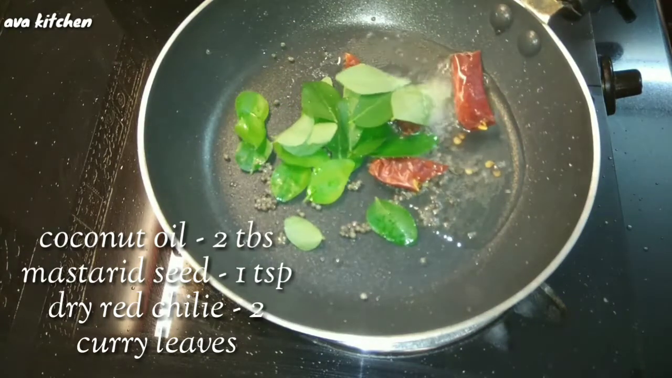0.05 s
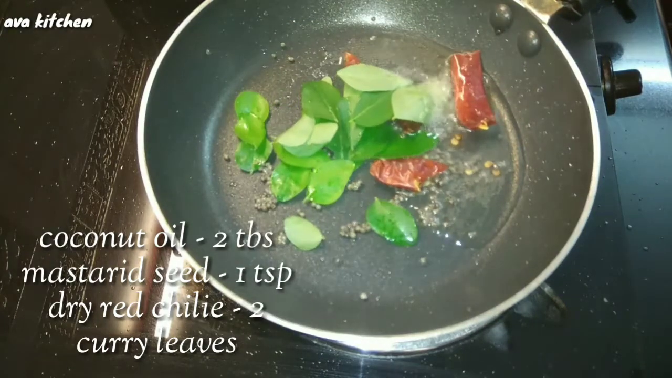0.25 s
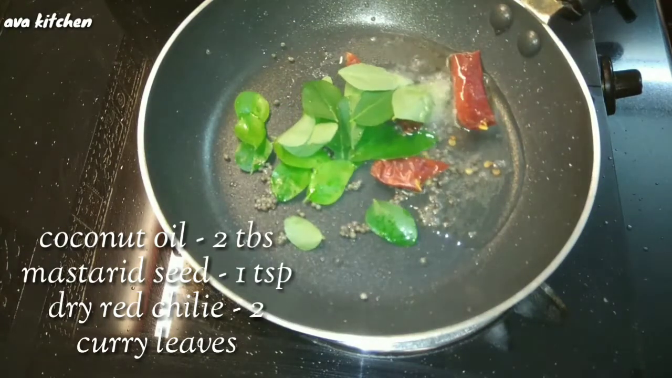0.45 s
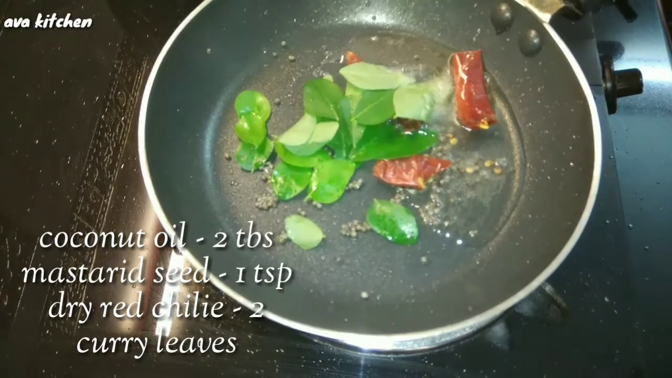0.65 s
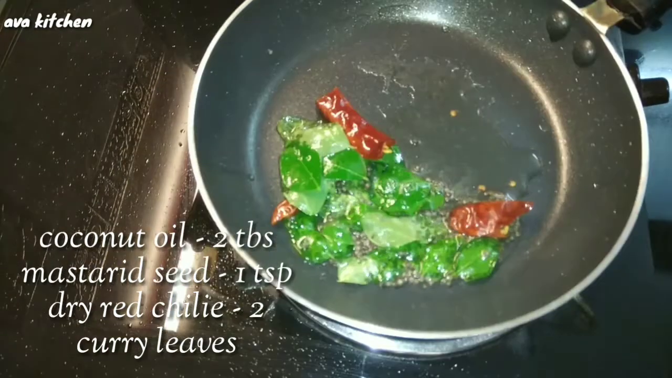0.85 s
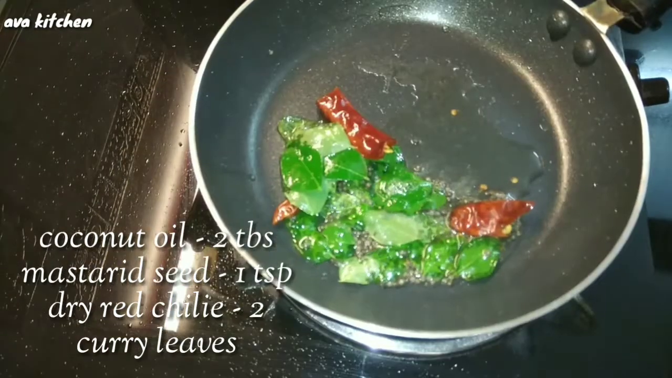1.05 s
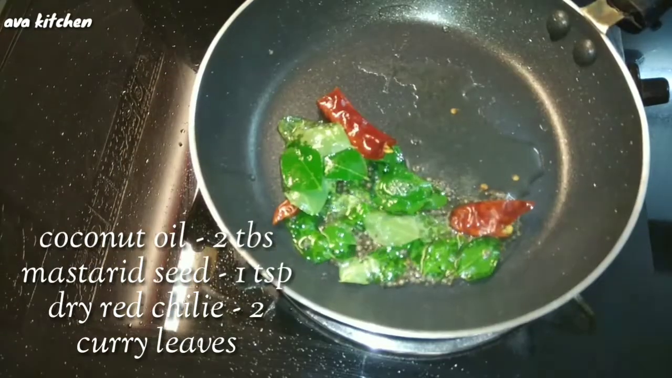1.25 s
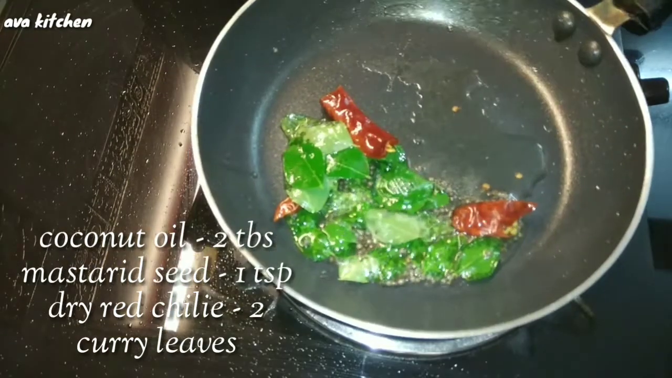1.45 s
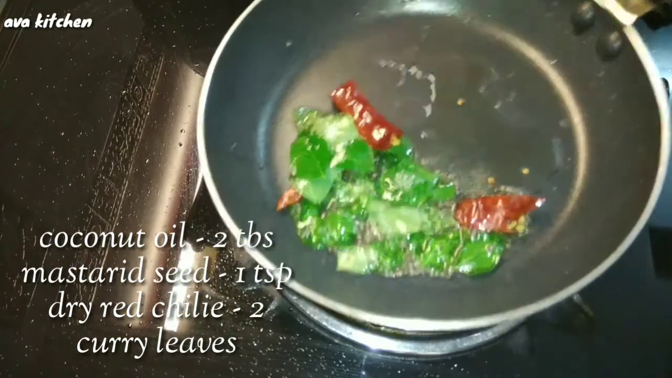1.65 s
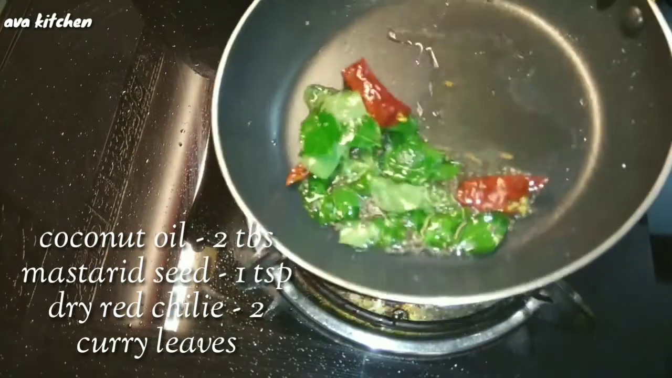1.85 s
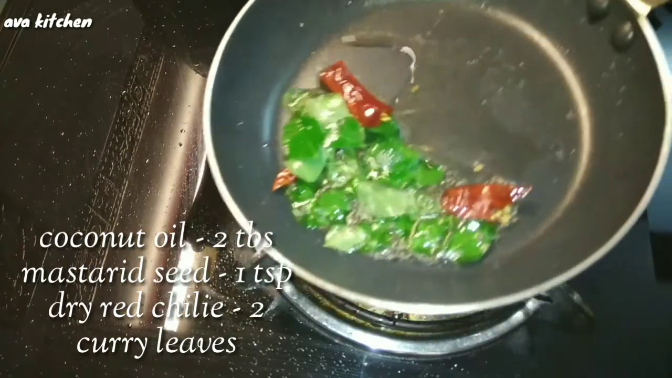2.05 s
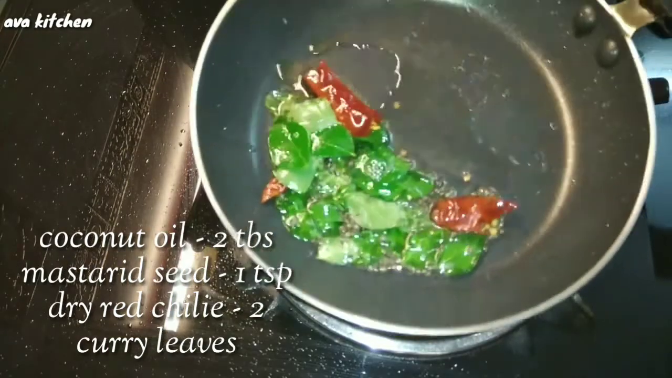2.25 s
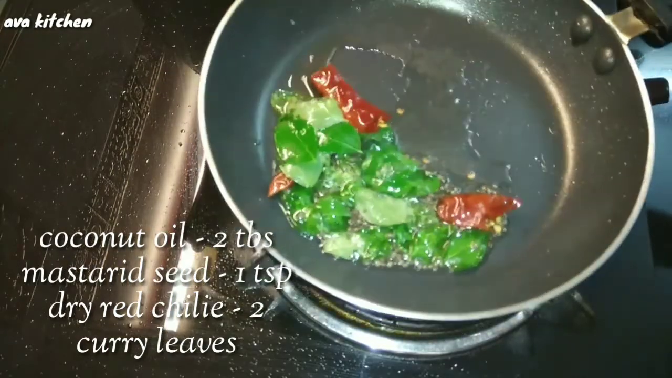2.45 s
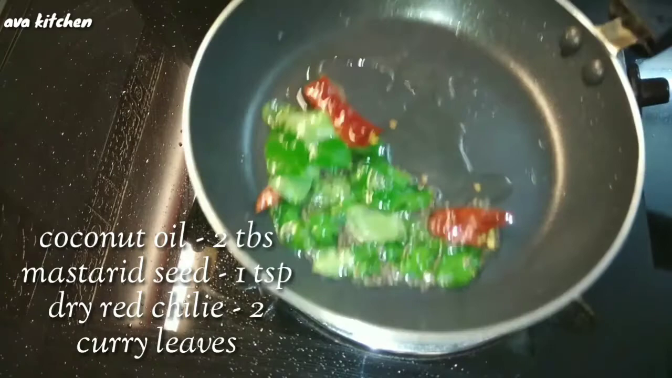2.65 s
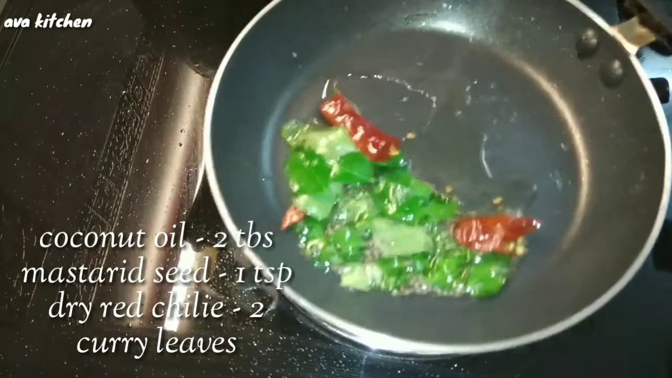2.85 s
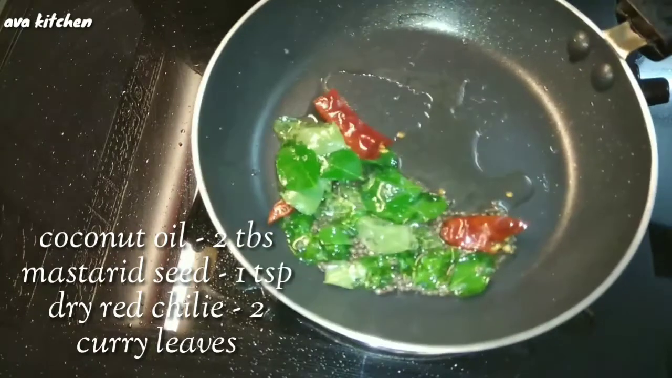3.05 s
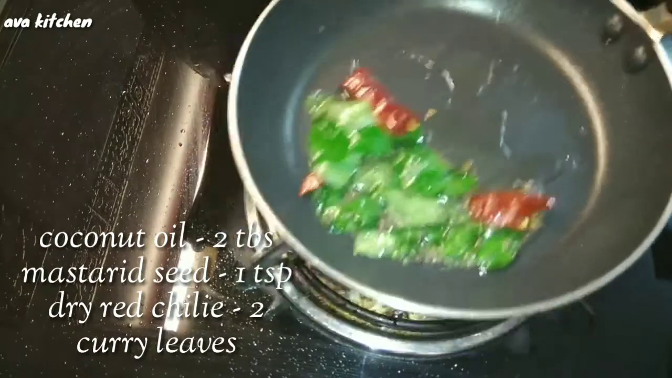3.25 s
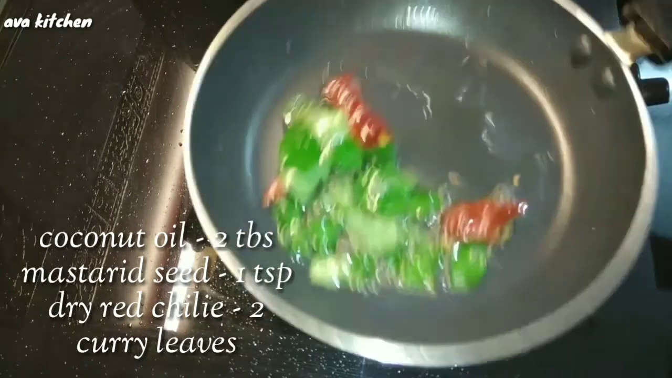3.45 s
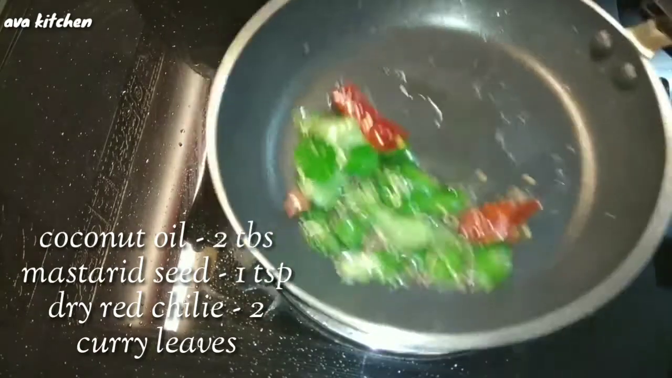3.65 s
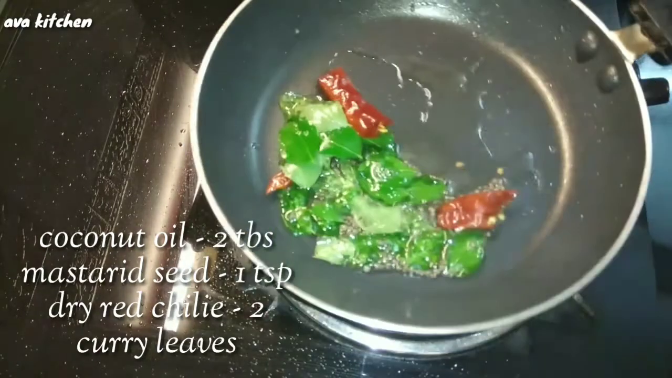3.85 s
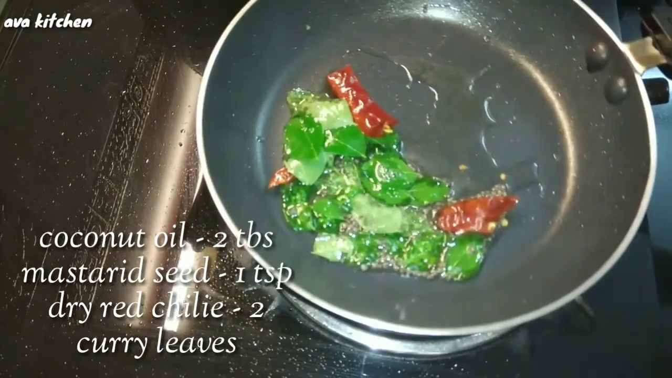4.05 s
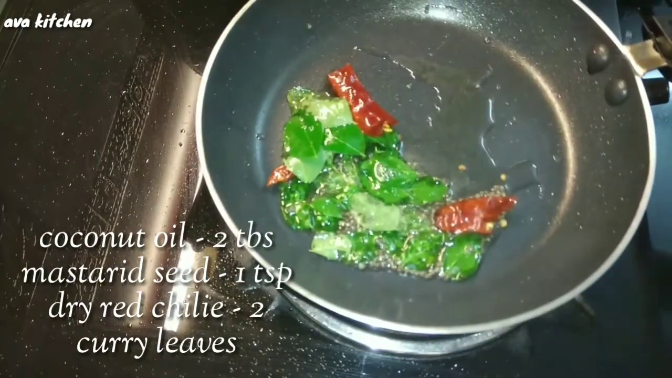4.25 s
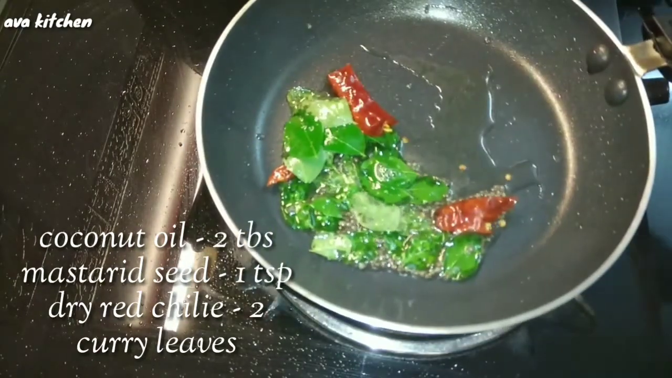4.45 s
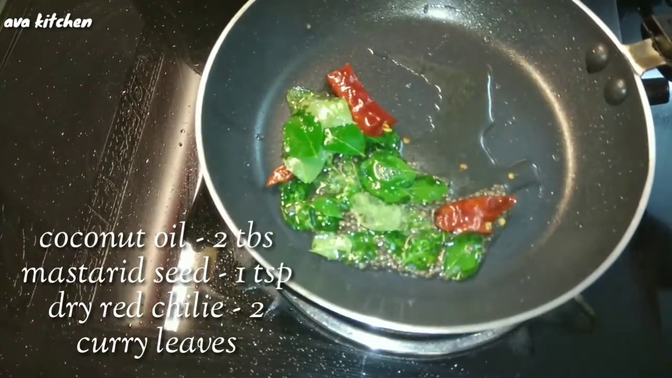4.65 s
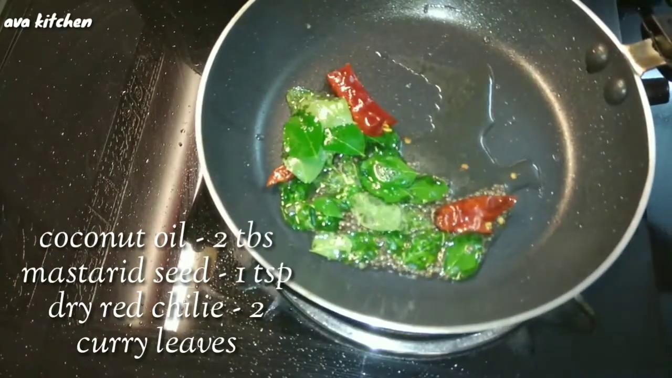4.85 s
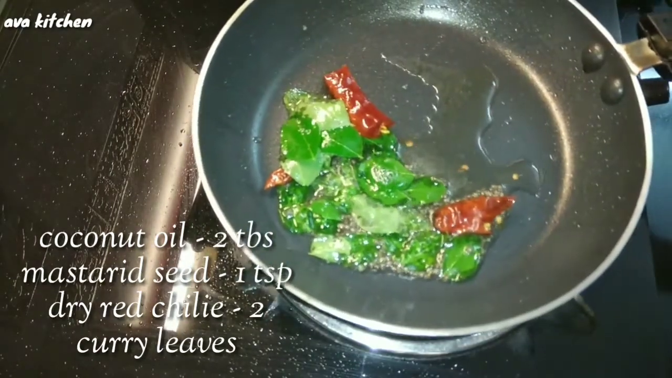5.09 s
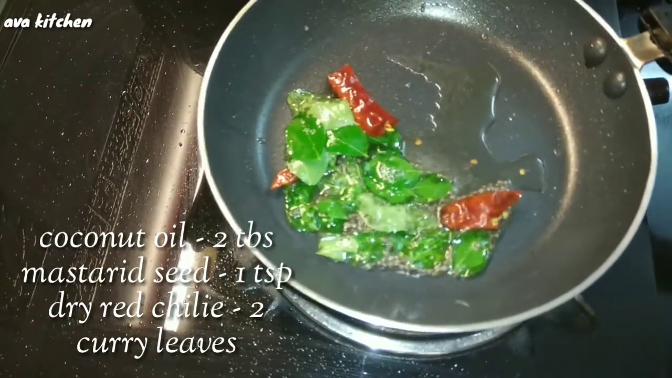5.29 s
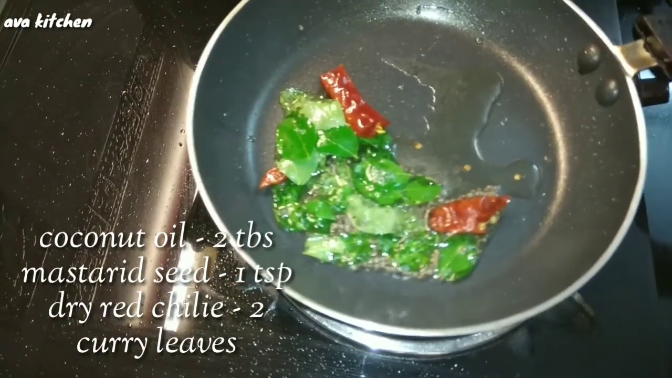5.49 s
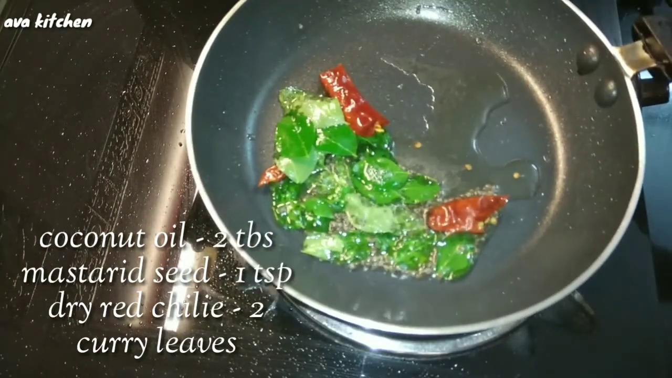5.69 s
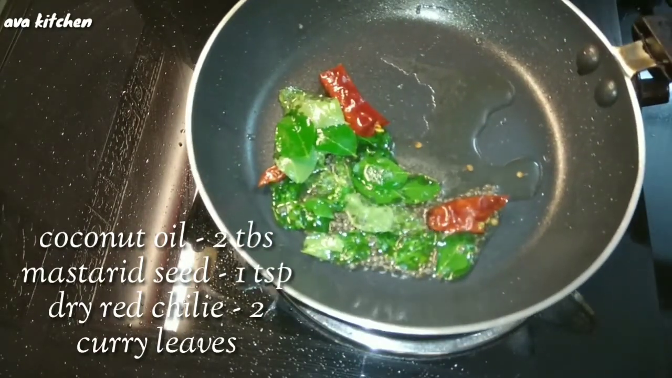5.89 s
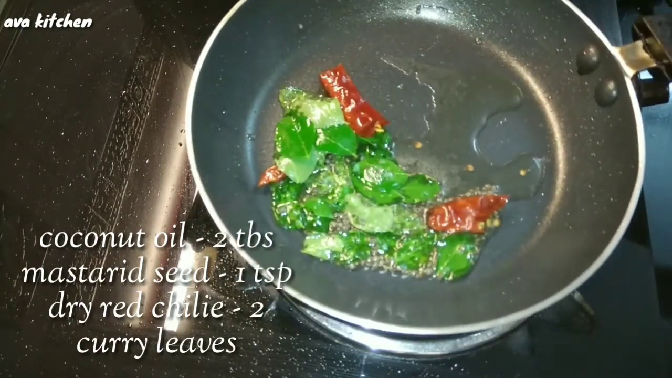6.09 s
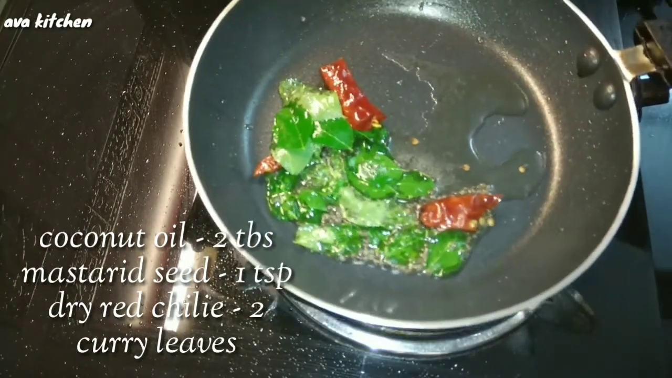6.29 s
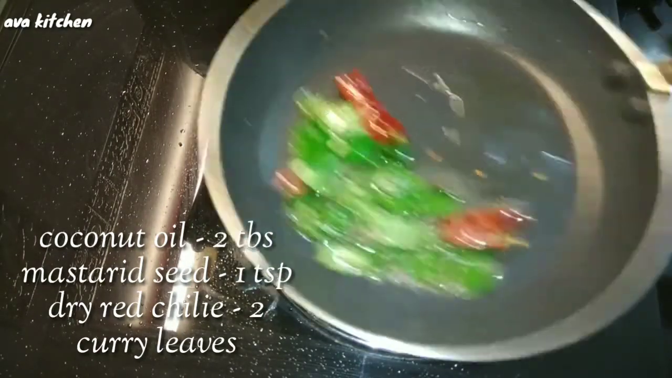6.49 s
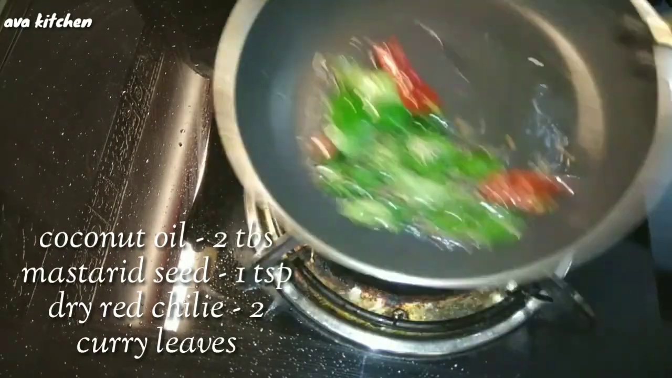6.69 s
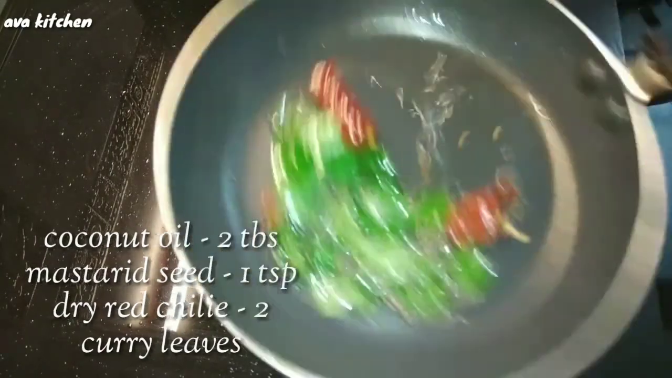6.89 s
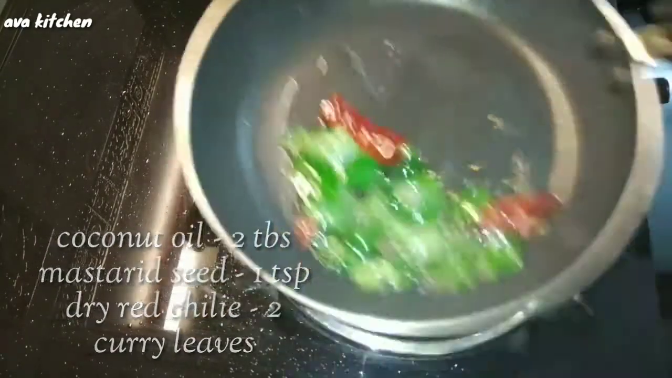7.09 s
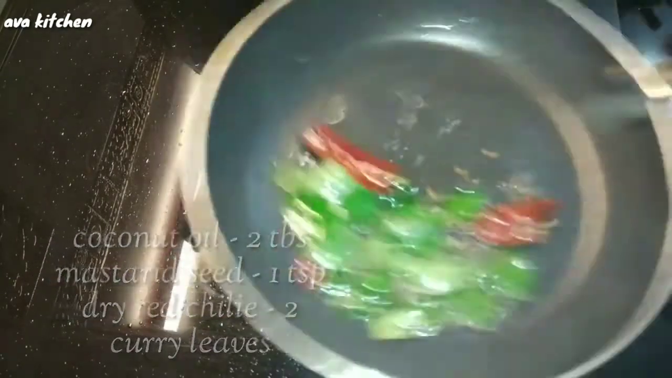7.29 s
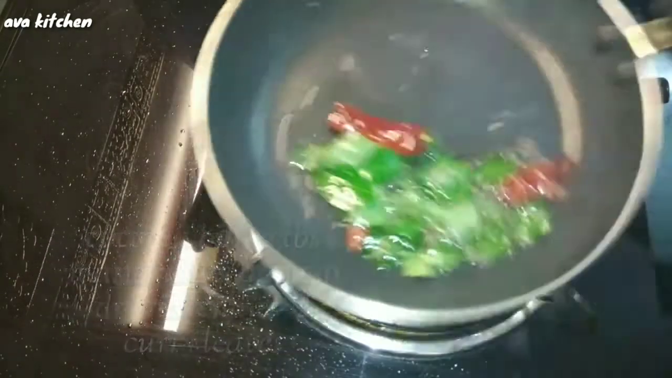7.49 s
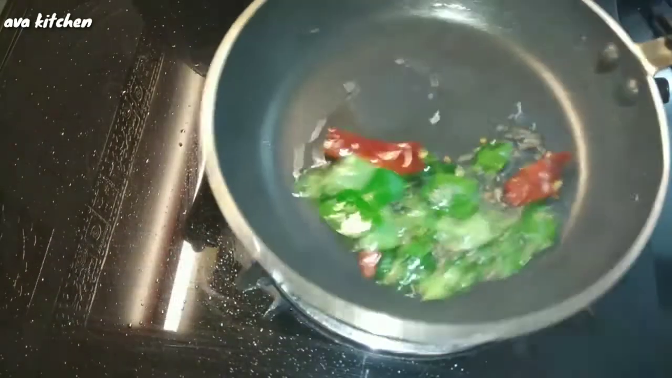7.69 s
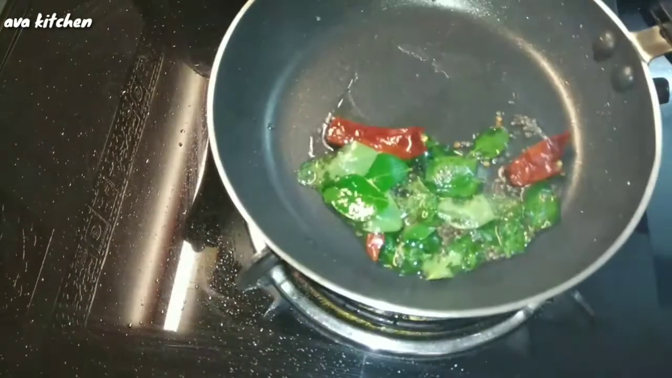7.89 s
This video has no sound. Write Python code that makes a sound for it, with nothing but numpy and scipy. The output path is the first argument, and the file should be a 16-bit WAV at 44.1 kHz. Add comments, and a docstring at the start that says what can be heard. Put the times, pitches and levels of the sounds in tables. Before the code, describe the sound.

Close up in a hard-walled kitchen, fresh leaves meet hot oil with a violent burst of bright hiss for half a second. The sizzle then drops to a thin fizz, full of sharp cracks, ticking bubbles and snapping pops. The small pan is shaken over its metal grate, knocking and scraping around two to three and a half seconds, then clanking hardest near seven and a half. A very faint low drone comes and goes.

```python
"""A fierce rush of sizzling, then cracks, pops and metallic knocks: curry leaves, dry chillies and mustard seeds
fry in a small pan, heard close in a hard-walled kitchen. Sizzle is shaped noise that swells in spurts; cracks are
resonated noise bursts; pops join a bright spray to a ringing snap. The shaken pan sounds by decaying modes, rattle
and rubbing noise. A faint low drone of wavering partials comes and goes; the loudest pops saturate."""
import sys
import numpy as np
from scipy import signal
from scipy.fft import rfft, irfft, next_fast_len
from scipy.io import wavfile
from scipy.ndimage import map_coordinates

SR = 44100
rng = np.random.default_rng(int(sys.argv[2]) if len(sys.argv) > 2 else 0)


def transcribe(signal):
    """Save signal, clipped to [-1, 1], as a 16-bit WAV file at the path in sys.argv[1]."""
    frames = np.atleast_2d(signal).T
    limited = np.clip(frames, -1, 1)
    pcm = np.round(limited * 32767).astype(np.int16)
    wavfile.write(sys.argv[1], SR, pcm)


N = 349834
TOP_HZ = 15800  # upper band limit

# How hard the oil boils, fiercest as the fresh leaves meet it. Each row: time in seconds, relative level in dB.
BOIL = [(0, -8.5), (.11, -29.5), (.15, -18), (.44, -18), (.49, -29), (.88, -29.5), (1.15, -25),
        (1.5, -29.5), (1.85, -29.5), (2.5, -29), (3.66, -31), (4.22, -30), (5.1, -29.5), (5.47, -29.5),
        (5.66, -30.5), (6.1, -32.5), (6.45, -28), (7.93, -31)]
# Spectra of the gentle fizz and of the fine spray. Each row: frequency in Hz, relative density in dB per Hz.
FIZZ_SPECTRUM = [(200, -68), (700, -13), (1200, -4.5), (2400, 9), (6500, 1.5), (8000, 10.5), (9800, 20),
                 (12500, 19.5), (15500, 11)]
SPRAY_SPECTRUM = [(200, -36), (700, -21), (3000, -30.5), (6000, -5), (8000, -2.5), (9800, 1), (12500, 0.5),
                  (15500, 0)]


def sizzle(spread_db, spurt_share):
    """Superposition of impulses: countless tiny steam bubbles breaking at the leaves merge into noise."""
    boil_s, boil_db = np.transpose(BOIL)
    level_db = np.interp(np.arange(N) / SR, boil_s, boil_db)
    # steam escapes in little spurts, about 60 a second, which start at once and fade
    flow = unit(np.sqrt(1 + spurt_share * spurts(60, fade_s=.008)))
    bubbles = spiky(N, spread_db) * flow * amp(level_db - 2.5)
    # when the oil boils hard, the power passes from the fizz to a fine bright spray
    fierce = np.clip((level_db + 27.5) / 12, 0, 1)
    fizz = coloured(bubbles * np.sqrt(1 - fierce), FIZZ_SPECTRUM)
    return fizz + coloured(bubbles * np.sqrt(fierce), SPRAY_SPECTRUM)


# The loudest bursts of water in the oil. Each row: start in seconds, relative spray level in dB over 10 ms,
# relative snap level in dB over 10 ms, life in seconds.
WATER_BURSTS = [(0.1434, -11, -14, 0.01), (0.165, -5.5, -21, 0.0051), (0.441, -9.5, -18, 0.0018),
                (0.5593, -21, -23, 0.0057), (0.6646, -13, -18, 0.0033), (1.3647, -24, -20, 0.0024),
                (1.6865, -12, -24, 0.0038), (1.712, -19.5, -19, 0.0044), (1.819, -26, -22.5, 0.0067),
                (1.925, -22, -17.5, 0.0038), (2.1817, -11.5, -11, 0.003), (2.3335, -22.5, -24, 0.0024),
                (2.4675, -7.5, -14.5, 0.0026), (2.7, -18.5, -21, 0.0082), (3.475, -20, -19, 0.0028),
                (3.598, -26, -15, 0.0044), (3.8111, -18, -21, 0.001), (4.0449, -20.5, -26, 0.004),
                (5.1025, -18, -27.5, 0.007), (5.2505, -13.5, -25, 0.0034), (5.346, -9.5, -24.5, 0.0045),
                (6.257, -15, -29, 0.0046), (6.4445, -18, -47, 0.0048), (6.4817, -18, -30.5, 0.019),
                (6.8648, -7.5, -28.5, 0.0052), (7.1883, -17, -16.5, 0.0041)]
# Spectrum of the snap. Each row: frequency in Hz, relative density in dB per Hz.
SNAP_SPECTRUM = [(40, 2), (200, -4), (600, 4), (1200, 10), (2200, 5), (4000, 16), (6500, 19), (9000, 14),
                 (15000, -63)]


def pops(rows, grain_db, jet_hz, jet_share, cavity_hz, cavity_q, ring_share, froth_db):
    """Flash boiling and cavity resonance: a drop turns to steam, snaps, rings briefly and sprays droplets."""
    spray, snap = np.zeros((2, 2, N))
    t = np.arange(SR // 6) / SR
    rise, fade = 1 - np.exp(-t / .0006), np.exp(-t / .04)

    def blow(x, db):
        return amp(db) * burst(x, .01)

    for s, spray_db, snap_db, life in rows:
        # the longest bursts leave a patch of froth that fizzes on
        froth_gain = amp(froth_db) * min(life / .007, 1) ** 2
        froth = froth_gain * fade * rng.standard_normal((2, len(t)))
        droplets = spiky(len(t), grain_db) * np.exp(-.5 * (t / life) ** 2)
        volley = rise * (droplets + froth)
        # the oil film tears first, in one needle-sharp crack
        volley += 1.5 * rng.standard_normal((2, len(t))) * np.exp(-t / .0002)
        # the steam leaves through a vent of its own size, which gives each burst a pitch
        vent_hz = jet_hz * np.exp(.12 * rng.standard_normal())
        jet = resonate(volley, vent_hz, 4.6)
        add(spray, s, blow(unit(volley) + jet_share * jet, spray_db))

        crack = spiky(len(t), grain_db) * np.exp(-(t / life) ** 2)
        ring_hz = cavity_hz * 1.7 ** (rng.random() - .5)
        ring = resonate(crack, ring_hz, cavity_q)
        add(snap, s, blow(unit(crack) + ring_share * ring, snap_db))
    return coloured(spray, SPRAY_SPECTRUM) + coloured(snap, SNAP_SPECTRUM)


def cracks(rows, life_s, spit_db, spit_s, q, low_hz):
    """Impulsive excitation of resonances: a sharp split rings at two pitches, and a faint spit follows it."""
    track = np.zeros((2, N))
    t = np.arange(int(6 * spit_s * SR)) / SR
    highpass = signal.butter(2, low_hz, "highpass", fs=SR)
    for s, db, hz in rows:
        life = life_s * np.exp(.5 * rng.standard_normal())  # life_s is the median
        envelope = np.exp(-t / life) * (1 - np.exp(-2 * t / life))
        split = rng.standard_normal((2, len(t))) * envelope
        split += amp(spit_db) * spiky(len(t), 6) * np.exp(-t / spit_s)
        ring = resonate(resonate(split, hz, q), hz, q)
        # the second pitch is weaker
        second_gain = .5 * rng.random()
        second_hz = hz * 2 ** rng.uniform(-1.92, 1)
        ring = ring + second_gain * resonate(split, second_hz, 2 * q)
        sound = signal.lfilter(*highpass, ring + .25 * unit(split))
        add(track, s, amp(db) * burst(sound, .01))
    return track


def crackles(per_second, least_db, spread_db, range_db, full_boil_db, count=1600):
    """Random arrivals: fainter cracks, louder in harder boiling, mostly high; rows of s, dB, pitch Hz."""
    when, size, colour, chance = rng.random((count, 4)).T
    s = when * N / SR
    boil_db = np.minimum(np.interp(s, *np.transpose(BOIL)), full_boil_db)
    size_db = np.minimum(-spread_db * np.log(size), range_db)
    lowness = colour ** 4  # mostly near 0; the lower cracks are also fainter
    rows = np.transpose([s, least_db + boil_db + size_db - 9 * lowness, 13000 * .22 ** lowness])
    return rows[chance < per_second * N / SR / count]


# Single sharp cracks, as a mustard seed or a blister on a leaf splits; the one at 6.134 s is the bright edge
# of a pan knock. Each row: start in seconds, relative level in dB over 10 ms, pitch in Hz.
SHARP_CRACKS = [(.0723, -25, 12100), (.1151, -13, 11700), (.1575, -11, 10800), (.2393, -14, 6800),
                (.2686, -17, 10400), (.3845, -12.5, 11300), (.6106, -18.5, 9500), (.6986, -19.5, 7600),
                (.7494, -15.5, 12000), (.7679, -14.5, 10200), (.832, -18.5, 9300), (.9463, -22, 8200),
                (1.0476, -15, 8400), (1.0839, -24.5, 10900), (1.146, -21.5, 2310), (1.2529, -22.5, 3360),
                (1.3409, -19.5, 4100), (1.7669, -20.5, 3300), (1.952, -14, 13100), (2.2467, -11, 11300),
                (2.7812, -18, 12800), (2.9387, -20, 7200), (3.0752, -21, 12400), (3.1009, -20, 11600),
                (3.1661, -19.5, 11300), (3.3055, -23, 11700), (3.3239, -17.5, 12400), (3.4274, -15, 11200),
                (3.4425, -22, 11800), (3.5391, -14.5, 10400), (3.613, -20, 12600), (3.7755, -15.5, 11700),
                (3.8773, -20.5, 5300), (3.9698, -19.5, 10400), (4.0011, -21, 5100), (4.0122, -23, 12000),
                (4.0553, -29, 10300), (4.4717, -20, 6760), (4.508, -21, 7900), (4.5484, -23, 10000),
                (4.8158, -24.5, 8250), (4.9936, -19, 10200), (5.0097, -20, 2050), (5.2168, -15.5, 11900),
                (5.2248, -19, 11600), (5.2359, -27, 11300), (5.3067, -15, 9800), (5.4165, -20, 11000),
                (5.4371, -13, 12100), (5.46, -30, 2020), (5.4921, -14, 9500), (5.4996, -18, 12500),
                (5.5249, -11, 12800), (5.6392, -21.5, 9800), (5.679, -13, 13200), (5.7957, -22, 13300),
                (6.017, -19.5, 7250), (5.8632, -19, 13100), (6.134, -24, 11300), (6.1919, -23, 9500),
                (6.2096, -19, 5900), (6.3307, -14.5, 8400), (6.3823, -22, 11400), (7.0918, -18, 6800),
                (7.115, -21.5, 12200), (7.1265, -14.5, 13100), (7.1638, -26, 10400), (7.3311, -20.5, 11400),
                (7.3437, -36, 10800), (7.3838, -19, 10700), (7.6069, -16, 9700), (7.7939, -20, 3520),
                (7.8528, -16, 11200)]


def sharp_cracking():
    """Impulsive excitation: distinct sharp cracks stand out over a random scatter of fainter ones."""
    faint = crackles(per_second=34, least_db=-1.5, spread_db=3.5, range_db=8.5, full_boil_db=-28)
    rows = np.vstack([SHARP_CRACKS, faint])
    return cracks(rows, life_s=.0008, spit_db=-19, spit_s=.005, q=1.8, low_hz=750)


def ticking_bubbles():
    """Brief impulses have wide spectra: many faint single bubbles close by tick needle-sharp."""
    rows = crackles(per_second=100, least_db=-12, spread_db=4.5, range_db=13, full_boil_db=-19)
    return cracks(rows, life_s=.0002, spit_db=-24, spit_s=.001, q=1.5, low_hz=2000)


# The pan meets the grate. Each row: start in seconds, then relative thud, ring and clang levels in dB over 20 ms.
GRATE_KNOCKS = [(1.171, -34.5, -30, -30.5), (2.012, -40, -21.5, -26), (2.064, -28, -28, -25.5),
                (2.1336, -22, -22, -20), (2.145, -19, -32, -25), (2.502, -29, -27.5, -34.5),
                (2.531, -30, -26, -41), (2.968, -27, -27, -24.5), (2.985, -20.5, -23.5, -30.5),
                (3.071, -38, -35, -33.5), (3.108, -31, -29, -36), (3.202, -38, -40, -52),
                (3.225, -40, -32, -59), (3.422, -34, -42, -54), (3.638, -31, -25.5, -22.5),
                (3.6501, -30.5, -25, -24.5), (4.903, -40, -37, -38.5), (4.945, -35, -31, -35),
                (6.1352, -36.5, -25.5, -23), (6.511, -29, -24.5, -27), (6.955, -40, -44.5, -67),
                (7.287, -32.5, -28.5, -41), (7.476, -30, -18.5, -19.5), (7.497, -19.5, -15.5, -15),
                (7.552, -27.5, -22, -24)]
# Modes of pan and grate. Each row: nominal frequency in Hz, mean relative level in dB, t60 in seconds.
PAN_MODES = [(221, -7, .17), (286, 3.5, .18), (335, -5, .12), (421, 1.5, .13), (580, -2, .1),
             (721, -4, .12), (780, -1, .11), (852, -1, .1), (932, 3, .13), (1130, -4, .06), (1235, 1, .07),
             (1405, -3, .07), (1535, 0, .07), (1715, 3, .09), (1870, -3, .05), (2340, -4, .08),
             (2770, -5, .09)]
# The registers of thud, ring and clang. Each row: lower edge in Hz, upper edge in Hz.
PAN_REGISTERS = [(190, 500), (500, 1050), (1050, 2800)]
# Spectrum of the metal contact. Each row: frequency in Hz, relative density in dB per Hz.
CLACK_SPECTRUM = [(600, -50), (1200, -9), (2800, -5.5), (4800, -23), (6000, -6.5), (7000, -18),
                  (8300, -7.5), (15000, -22)]


def pan(ring_db, rattle_db, rattle_t60, contact_db, contact_t60):
    """Impact excites modes: knocks ring three registers, rattle the loose grate and clack metal on metal."""
    ring, contact = np.zeros((2, 2, N))
    t = np.arange(SR // 4) / SR

    def rattle(t60):
        return rng.standard_normal((2, len(t))) * amp(-60 * t / t60)

    def blow(x, db):
        return amp(db) * burst(x, .02)

    for s, *levels in GRATE_KNOCKS:
        for (low, high), db in zip(PAN_REGISTERS, levels):
            band = signal.butter(2, [low, high], "bandpass", fs=SR)
            grate = signal.lfilter(*band, rattle(rattle_t60))
            modes = [mode for mode in PAN_MODES if low <= mode[0] < high]
            add(ring, s, blow(struck(modes, t), db + ring_db))
            add(ring, s, blow(grate, db + rattle_db))
        add(contact, s, blow(rattle(contact_t60), levels[-1] + contact_db))
    return ring + coloured(contact, CLACK_SPECTRUM)


def struck(modes, t):
    """Modal superposition: damped sines swell within a cycle, with levels and pitches redrawn at each call."""
    hz, db, t60 = np.transpose(modes)[:, :, None]
    level = amp(db + 2.5 * rng.standard_normal(hz.shape) - 60 * t / t60)
    # pitches shift with the point where the pan rests
    hz = hz * (1 + .018 * rng.standard_normal(hz.shape))
    waves = np.sin(2 * np.pi * (hz * t + rng.random((2, len(hz), 1))))
    return np.sum(level * waves * (1 - np.exp(-t * hz / .7)), axis=1)


# The pan rubs on the grate, dragged or barely shifting in the cook's hand.
# Each row: start in seconds, length in seconds, relative level in dB.
RUBS = [(1.48, 0.062, -42.5), (2.25, 0.39, -39), (2.84, .15, -38.5), (3.05, 0.22, -31.5), (3.29, 0.21, -38)]
# Spectrum of the rubbing. Each row: frequency in Hz, relative density in dB per Hz.
SCRAPE_SPECTRUM = [(80, -39), (180, -12.5), (290, -2), (420, 0.5), (520, -4), (850, 4.5), (1100, -17),
                   (1800, -14), (4000, -13)]
# the pan also skids at every knock: dB relative to the knock's ring entry, and seconds
SKID_DB, SKID_S = -7.5, 0.033
RUB_ATTACK_S, RUB_FALL_DB_PER_S = 0.012, 140


def slide(ring_share):
    """Stick-slip friction: the base judders as it rubs over the grate, which keeps its modes ringing."""
    skids = [(s, SKID_S, db + SKID_DB) for s, _, db, _ in GRATE_KNOCKS]
    strokes = list(RUBS) + skids
    force = np.max([amp(db) * swell(s, length, RUB_ATTACK_S, RUB_FALL_DB_PER_S)
                    for s, length, db in strokes], axis=0)
    # the base catches and slips about 55 times a second
    catches = .7 + spurts(55, fade_s=.006)
    rub = force * unit(rng.standard_normal((2, N)) * catches)
    body = struck(PAN_MODES, np.arange(SR // 4) / SR)
    ringing = signal.oaconvolve(rub, body / np.linalg.norm(body[0]), axes=1)[:, :N]
    return coloured(rub, SCRAPE_SPECTRUM) + ring_share * ringing


# Reverberation of the kitchen. Each row: frequency in Hz, t60 in seconds.
ROOM_DECAY = [(200, 0.58), (3000, 0.39), (10000, 0.21), (15000, 0.32)]


def kitchen(x, wet_db):
    """Reverberation: a diffuse tail answers from the walls, and each frequency dies at its own speed."""
    hz, t, z = signal.stft(rng.standard_normal((2, SR // 2)), SR, nperseg=256)
    decay = amp(-60 * t / along(ROOM_DECAY, hz)[:, None])
    onset = 1 - np.exp(-t / 0.00041)
    tail = signal.istft(z * decay * onset, SR, nperseg=256)[1]
    tail = tail / np.linalg.norm(tail[0])
    return x + amp(wet_db) * signal.oaconvolve(x, tail, axes=1)[:, :N]


# Likeness of the two microphones. Each row: frequency in Hz, left-right correlation from 0 to 1.
LIKENESS = [(60, .75), (250, .96), (800, .85), (3000, .15), (7000, 0)]
# Balance of the two microphones. Each row: frequency in Hz, left minus right in dB.
BALANCE = [(400, -1.5), (2400, 1), (8500, -1.5), (10500, -2.5), (13000, 6)]


def microphones(x):
    """Spatial coherence: long waves reach both microphones alike, short ones differently."""
    def mix(hz):
        angle = np.arccos(np.clip(along(LIKENESS, hz), -1, 1)) / 2
        return np.array([np.cos(angle), np.sin(angle)])

    def lean(hz):
        return amp(along(BALANCE, hz) * np.array([[.5], [-.5]]))

    mid, side = filtered(x, mix)
    return filtered(np.array([mid + side, mid - side]), lean)


# Swells of a low drone, perhaps traffic outside. Each row: start in seconds, length in seconds,
# pitch at the start in Hz, glide in Hz per second, relative level in dB.
DRONE_SWELLS = [(0.448, 0.79, 134, 9.5, -47.5), (1.43, 0.76, 137, -16, -55.5),
                (4.351, 0.37, 161, -16.5, -53.5), (5.258, 0.58, 147, 2.5, -58.5),
                (6.04, 0.16, 146, -1.5, -46), (7.05, 0.6, 135, -16, -49)]
# Its partials, spaced like an engine's. Each row: ratio to the pitch, relative level in dB.
DRONE_PARTIALS = [(.8, -7), (1, 0), (1.2, -7)]
DRONE_ATTACK_S, DRONE_FALL_DB_PER_S = 0.07, 90
# Spectrum of the still air. Each row: frequency in Hz, relative density in dB per Hz.
AIR_SPECTRUM = [(20, -18.5), (140, -1.5), (400, -13), (8000, -83)]


def background(air_db):
    """Additive synthesis over noise: a wavering low drone swells and fades over the room's still air."""
    drone = np.zeros(N)
    # a complex gain wavers both the strength and the phase of each partial
    wavers = [0.67 + 0.52 * (wobble(28) + 1j * wobble(28)) for _ in DRONE_PARTIALS]
    for s, length, hz, glide, db in DRONE_SWELLS:
        phase = 2 * np.pi * np.cumsum(hz + glide * (np.arange(N) / SR - s)) / SR
        tone = np.zeros(N)
        for (ratio, level_db), waver in zip(DRONE_PARTIALS, wavers):
            tone += amp(level_db) * np.real(waver * np.exp(1j * ratio * phase))
        drone += amp(db) * swell(s, length, DRONE_ATTACK_S, DRONE_FALL_DB_PER_S) * tone
    air = microphones(coloured(rng.standard_normal((2, N)), AIR_SPECTRUM))
    return drone + amp(air_db) * air


def amp(db):
    """Logarithmic level: decibels to linear gain."""
    return 10 ** (np.asarray(db) / 20)


def unit(x):
    """Mean-square normalisation: x at an rms of 1."""
    return x / np.sqrt(np.mean(x ** 2) + 1e-20)


def burst(x, seconds):
    """Equal energy: stereo x with the energy of an rms of 1 held for that long."""
    return unit(x) * np.sqrt(seconds * SR / x.shape[-1])


def along(points, hz):
    """Logarithmic frequency scale: (Hz, value) points interpolated on a log axis."""
    f, v = np.transpose(points)
    return np.interp(np.log(hz + 1), np.log(f), v)


def wobble(rate):
    """Band-limited fluctuation: a smooth random curve, rate knots a second."""
    knots = rng.standard_normal(int(N * rate / SR) + 4)
    return map_coordinates(knots, [np.arange(N) * rate / SR])


def filtered(x, response):
    """Linear filtering: the spectrum of x times a response of frequency."""
    size = next_fast_len(N + SR // 4)
    return irfft(rfft(x, size) * response(np.fft.rfftfreq(size, 1 / SR)), size)[..., :N]


def coloured(x, spectrum, size=2048):
    """Minimum-phase filtering: a causal filter of that spectrum which keeps the power of white noise."""
    hz = np.fft.rfftfreq(size, 1 / SR)
    gain = amp(along(spectrum, hz))
    gain = gain / np.sqrt(np.mean(gain ** 2 * (hz < TOP_HZ)))
    # folding the cepstrum onto positive times makes the filter causal
    cepstrum = irfft(np.log(gain))
    cepstrum[1:size // 2] *= 2
    cepstrum[size // 2 + 1:] = 0
    impulse = irfft(np.exp(rfft(cepstrum)))
    return signal.oaconvolve(x, impulse[None], axes=1)[:, :N]


def add(track, s, sound):
    """Superposition: mix a sound into a track at time s."""
    start = min(max(round(s * SR), 0), N)
    track[:, start:start + sound.shape[1]] += sound[:, :N - start]


def spiky(size, spread_db):
    """Log-normal granularity: stereo noise of tiny cracks, eight samples long and of unequal strength."""
    grain_db = spread_db * np.clip(rng.standard_normal(size // 8 + 1), -3, 2.5)
    strength = np.repeat(amp(grain_db), 8)[:size]
    return unit(strength * rng.standard_normal((2, size)))


def spurts(per_second, fade_s):
    """Shot noise: random jolts of unequal strength start at once and fade exponentially."""
    starts = (rng.random(N) < per_second / SR) * rng.exponential(size=N)
    return signal.lfilter([1], [1, -np.exp(-1 / (fade_s * SR))], starts)


def resonate(x, hz, q):
    """Simple resonance: x through one resonator, at an rms of 1."""
    return unit(signal.lfilter(*signal.iirpeak(min(hz, TOP_HZ), max(q, 1), SR), x))


def swell(s, length, attack_s, fall_db_per_s):
    """Exponential decay: an envelope rises from time s, holds until length has passed, then dies away."""
    t = np.arange(N) / SR - s
    return np.clip(t / attack_s, 0, 1) * amp(-fall_db_per_s * np.maximum(t - length, 0))


def scene():
    """Superposition of sources: frying and pan noises sound in the kitchen over the background."""
    cracking = sharp_cracking()
    ticking = ticking_bubbles()
    spitting = pops(WATER_BURSTS, grain_db=4.5, jet_hz=10960, jet_share=1.0, cavity_hz=2200,
                    cavity_q=2.6, ring_share=1.2, froth_db=-10)
    sizzling = sizzle(spread_db=1.5, spurt_share=30)
    frying = kitchen(sizzling + amp(0.92) * cracking + ticking + spitting, wet_db=-5.5)

    knocks = pan(ring_db=-2, rattle_db=-5.5, rattle_t60=.06, contact_db=-2.5, contact_t60=.028)
    cookware = kitchen(knocks + slide(ring_share=0.22), wet_db=-14.0)
    return microphones(frying + cookware) + background(air_db=-63)


def record(dry):
    """Saturation: the loudest pops flatten against full scale, with the band limited before and after."""
    def below_top(hz):
        return hz < TOP_HZ

    x = filtered(dry, below_top)
    return filtered(x / (1 + x ** 8) ** (1 / 8), below_top)


dry = scene()
out = record(dry)
transcribe(out)
```